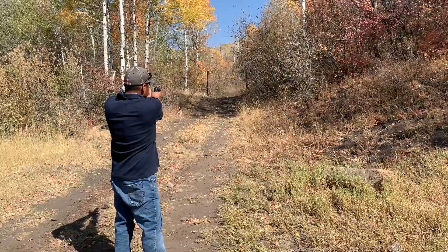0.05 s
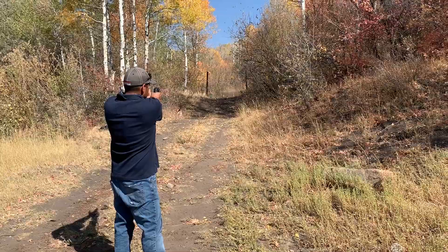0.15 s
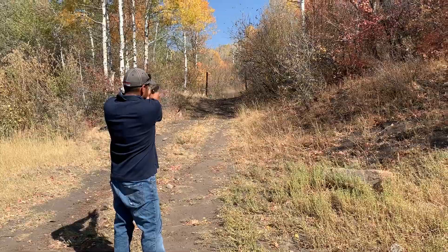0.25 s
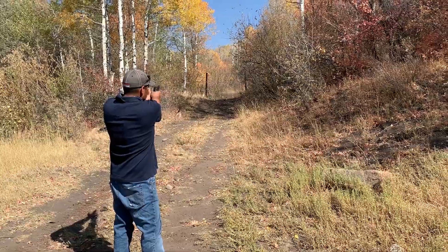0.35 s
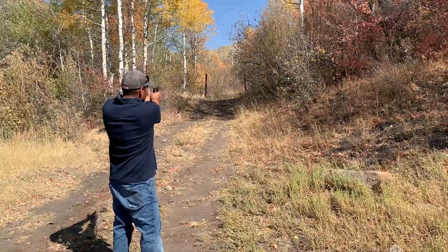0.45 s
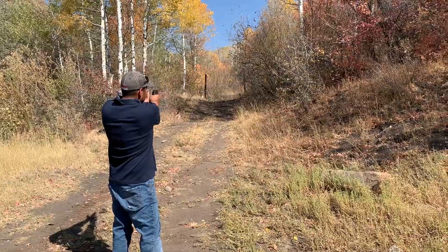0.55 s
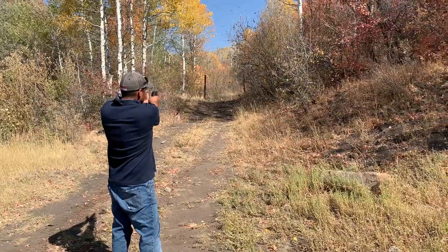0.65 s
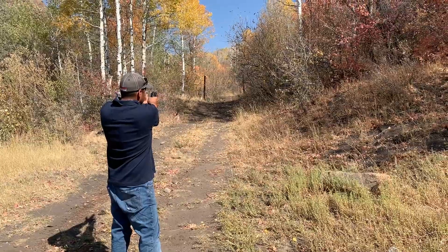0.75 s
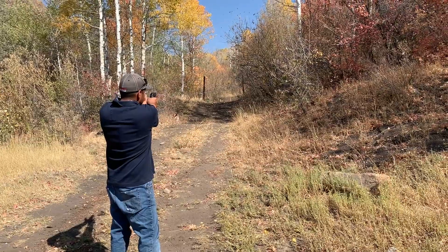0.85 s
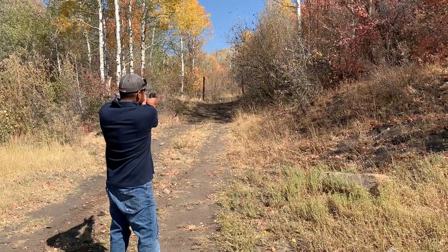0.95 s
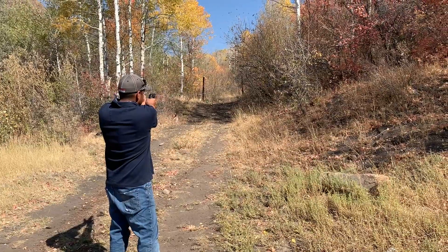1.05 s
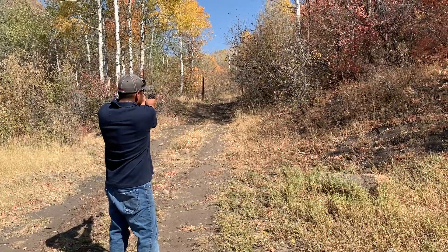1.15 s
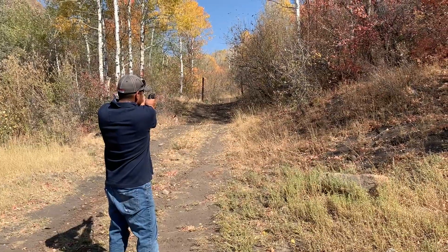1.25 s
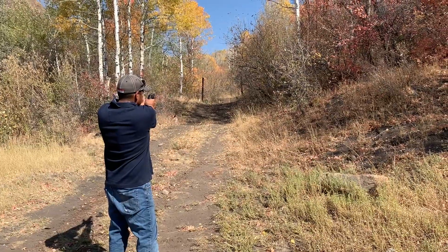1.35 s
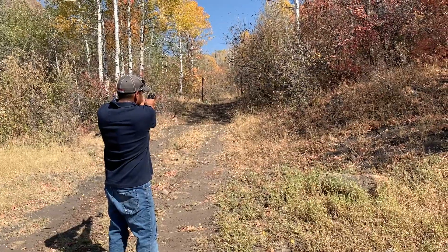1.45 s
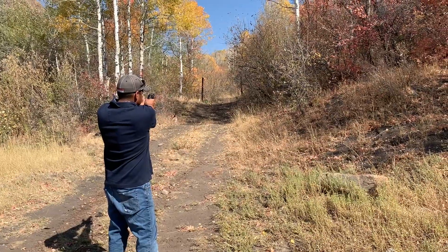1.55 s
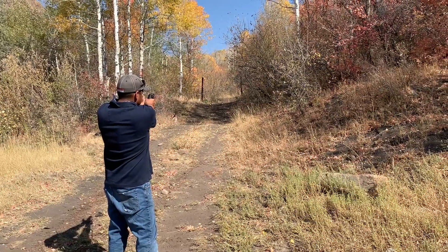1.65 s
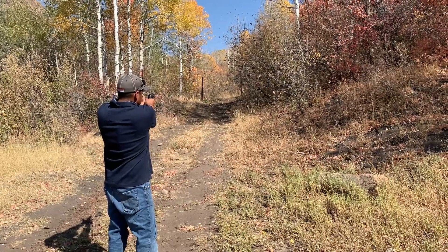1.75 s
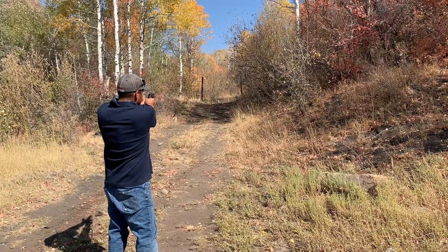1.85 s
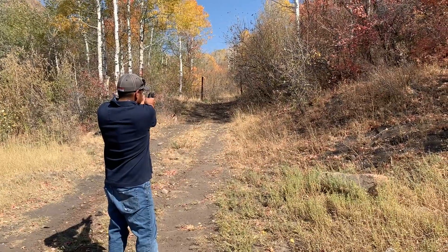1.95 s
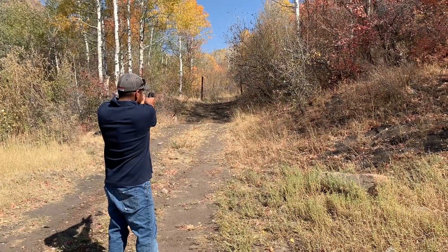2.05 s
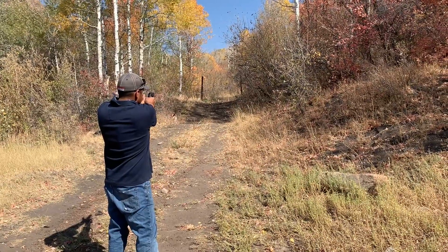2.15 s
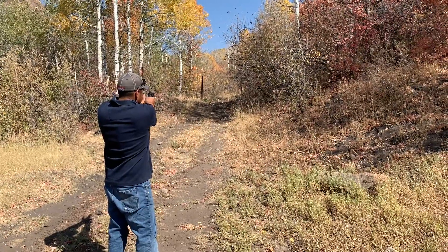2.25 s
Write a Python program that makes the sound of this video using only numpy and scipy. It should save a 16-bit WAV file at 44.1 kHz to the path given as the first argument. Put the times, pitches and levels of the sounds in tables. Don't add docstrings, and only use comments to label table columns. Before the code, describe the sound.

One handgun shot on an open wooded dirt track, picked up by a phone a few steps away; small metal clicks precede the distorted bang, its echo fades, a casing tinkles, and wind softly buffets the microphone.

```python
import sys
import numpy as np
from scipy import signal
from scipy.fft import rfft, irfft
from scipy.io import wavfile
from scipy.ndimage import uniform_filter1d

SR = 44100
rng = np.random.default_rng(int(sys.argv[2]) if len(sys.argv) > 2 else 0)


def elevation(decibels):
    levels = np.asarray(decibels, float)
    return 10 ** (levels / 20)


def wrap_up_sound(samples):
    columns = np.atleast_2d(samples).T
    tamed = np.clip(columns, -1, 1)
    steps = np.round(tamed * 32767).astype(np.int16)
    wavfile.write(sys.argv[1], SR, steps)


N = 101430

# (frequency [Hz], level [dB])
AIR_SPECTRUM = [(180, -31.5), (300, -6), (987, -20.5), (2470, -18), (3290, -22), (6110, -23.5),
                (14000, -29)]
# (time [s], level [dB])
GUST_LEVELS = [(0.0, -56.5), (0.11, -53), (0.27, -49.5), (0.38, -58), (0.56, -53.5), (0.7, -60.5),
               (0.77, -54), (0.88, -60), (1.02, -49), (1.12, -52), (1.3, -62.5), (1.4, -67.5), (1.55, -64),
               (1.66, -69), (1.74, -61), (1.9, -61), (2.05, -54.5), (2.3, -54)]
# (frequency [Hz], level [dB])
WIND_SPECTRUM = [(12, -51.5), (22, -15), (45, -1), (76, -3), (236, -24), (338, -28.5), (462, -42.5),
                 (700, -41), (910, -70.5), (1540, -120)]
# (time [s], peak [dB], frequency [Hz])
LARGE_EDDIES = [(0.096, -75, 72), (0.142, -46.5, 68.5), (0.612, -45, 71.5), (0.643, -45.5, 73.3),
                (0.799, -37, 71), (0.833, -47.5, 72.1), (0.892, -57, 74.2), (0.92, -40.5, 71.3),
                (0.984, -48.5, 76), (1.038, -33.5, 88), (1.056, -31, 69.4), (1.111, -37.5, 74.3),
                (1.232, -47, 68.2), (1.427, -55, 71.4), (1.568, -41.5, 72.8), (1.775, -44, 72.3),
                (1.834, -45, 71.6), (1.949, -51, 72.2), (1.971, -41, 71.8), (2.018, -52, 72.6),
                (2.065, -44, 70.8), (2.097, -41, 72), (2.179, -49.5, 71.95), (2.25, -51.5, 73)]
# (time [s], peak [dB], left-right [dB], scrape centre [Hz])
TRIGGER_CLICKS = [
    (0.0534, -26, -3.5, 4870),
    (0.0572, -35, -9, 3550),
    (0.0624, -41, 2, 8000),
    (0.18, -32.5, -5.5, 5000),
    (0.1837, -38, -0.5, 5850),
]
# (frequency [Hz], level [dB], T60 [s])
STEEL_MODES = [(570, -13, 0.029), (1200, -8.5, 0.015), (2160, 5, 0.013), (3000, -1, 0.01),
               (4440, -7, 0.011), (6360, -2, 0.012), (9300, -8.5, 0.0048), (13200, -10, .01)]
# (centre [Hz], width [Hz], left [dB], right [dB])
PRE_NOISE_BEDS = [(630, 240, -14.5, -21.5), (1505, 890, -27, -28.5), (3000, 1400, -32, -21.5),
                  (4430, 1800, -33, -15), (6800, 2400, -33, -19.5), (12000, 5000, -47, -46)]
# (frequency [Hz], left [dB], right [dB])
PRE_NOISE_STREAKS = [(535, -14.5, -23.5), (1500, -32.5, -22.5), (2240, -31, -21.5), (3116, -35, -23),
                     (3660, -37, -22), (3960, -36, -16.5), (4470, -34, -16), (4900, -27, -29),
                     (5300, -36, -23), (5980, -36, -17), (6700, -24, -29), (7000, -29, -24),
                     (7600, -33, -23), (8000, -19, -16.5)]
# (frequency [Hz], level [dB])
CRACK_SPECTRUM = [(500, -10), (1500, 1), (4000, -3), (8000, 3.5), (10500, -3), (13200, -6), (15200, 1),
                  (16400, -32)]
# (frequency [Hz], level [dB])
BRUSH_SPECTRUM = [(180, -30), (300, -0.5), (1010, -9.5), (2740, -20.5), (3350, -15.5), (8790, -21.5),
                  (12900, -23), (16000, -33.5)]
# (frequency [Hz], level [dB])
TRUNK_SPECTRUM = [(88, -50.5), (180, -22.5), (420, -12), (680, -6), (1050, -7), (1550, -20.5),
                  (2260, -14.5), (14000, -23.5)]
# (frequency [Hz], level [dB])
SLOPE_SPECTRUM = [(180, -44), (300, -16.5), (417, -21), (684, -2), (1520, -13), (2200, -9), (8000, -45.5),
                  (10400, -78.5), (17600, -120)]
# (time [s], peak [dB], frequency [Hz], left-right [dB])
SLAP_ECHOES = [(0.254, -19, 639.9, 2), (0.303, -29.5, 350, 2), (0.311, -29.5, 683, 2),
               (0.321, -25.5, 690, 3), (0.336, -27.5, 699, 5), (0.378, -28.5, 703, 8),
               (0.418, -33.5, 605, 3), (0.46, -34.5, 717, 3), (0.491, -44, 684, 3), (0.514, -42.5, 775, 1),
               (0.558, -43.5, 843, 2.5), (0.57, -42.5, 646, 4.5), (0.635, -48, 651, 1), (0.65, -46, 696, 4),
               (0.709, -50.5, 830, 3), (0.742, -49.5, 678, 2.5), (0.941, -59, 744, 0),
               (0.985, -60.5, 692, 0), (1.173, -70, 550, 0), (1.305, -69, 670, 0), (1.483, -72, 627, 0),
               (1.622, -74, 681, 0), (1.705, -66, 614, 0), (0.3043, -40, 2300, -1), (0.3222, -35, 2170, 3),
               (0.3711, -42, 2116, -3), (0.4345, -40.5, 2010, 3), (0.4799, -43.5, 2380, -0.5),
               (0.5008, -49.5, 1880, -1), (0.556, -52, 2050, 0), (0.7502, -54, 2020, -1.5)]
# (time [s], peak [dB], centre [Hz], left-right [dB])
GRASS_TICKS = [(0.49, -55.5, 11200, 21), (0.64, -65, 10000, -1.5), (.824, -68, 8000, -1),
               (1.018, -62.5, 2200, -0.5), (1.034, -71, 11500, 1), (1.064, -57.5, 2920, -0.5),
               (1.065, -62, 5450, -1), (1.12, -71, 2196, -4), (1.277, -78, 5500, 0), (1.3, -76, 5000, 0),
               (1.497, -64, 10040, -0.5), (1.509, -64.5, 5990, -2), (1.54, -75, 5500, 0),
               (1.6, -67, 12000, -0.5), (1.6762, -73, 2800, -2), (1.6933, -57.5, 6420, -3),
               (1.694, -66, 4000, -4.5), (1.713, -64, 5800, -3), (1.73, -70.5, 6300, -4),
               (1.81, -74, 4590, 0), (1.838, -63, 7000, -3), (1.837, -68, 2850, -1.5),
               (1.865, -68.5, 2500, -7), (1.866, -69, 5500, -4), (1.88, -73, 3500, -2),
               (1.9565, -59.5, 11030, 1), (1.957, -68, 3500, -2), (1.973, -68, 2610, -5),
               (1.983, -61.5, 4590, -6), (2.075, -81, 12000, -2), (2.165, -75, 7000, -1),
               (2.198, -72, 12000, -8.5), (2.196, -72, 3000, 0), (2.223, -78, 4500, 0)]
# (frequency [Hz], level [dB], T60 [s])
BRASS_MODES = [(3475, -7, 0.26), (4980, -23, 0.15), (5980, -22, 0.18), (8328, -13, 0.19), (8880, -15, 0.14),
               (9930, -12.5, 0.25), (10900, -17, 0.12), (11600, -5.5, 0.12), (13570, 0, 0.12),
               (13840, 0, 0.14), (13100, -3, 0.08), (14130, -16, 0.1), (15318, -16, 0.12),
               (15610, -21, 0.074)]

AIR_DB, EARLIER_ECHO_DB, EARLIER_T60_S = -79, -65, 1.2
NULL_HZ, NULL_WIDTH_HZ, CEILING_HZ = 11950, 950, 14700

WIND_DB, WIND_SIDE_DB, WIND_FLUTTER_DB = -4.5, -23.5, 2
SMALL_EDDIES_PER_S, SMALL_SCATTER_DB, SMALL_DB, SMALL_HZ = 50, 2, -0.5, 58.5
EDDY_START_RATIO, EDDY_SAG_S, EDDY_RISE_S, EDDY_T60_S = 4.1, 0.005, 0.0059, 0.15
SPRAY_DB, SPRAY_HZ, SPRAY_T60_S = -19, 290, 0.09
PORT_LAG_SAMPLES = -19

CLICK_RISE_S, CLICK_T60_S = 0.0003, 0.012

PRE_NOISE_DB_PER_S, PRE_NOISE_SPAN_S, PRE_NOISE_PEAK_S = 799, 0.03, 0.003
STREAK_WOBBLE_DB = 2.5

SHOT_S = 0.2394
CRACK_DB, CRACK_T60_S, CRACK_RISE_S, CRACK_LAG_SAMPLES = -2.5, 0.009, 0.0002, 1
BLAST_DB, BLAST_HOLD_S, BLAST_LAG_S, BLAST_T60_S = -3, 0.0062, 0.00012, 0.013
FIRST_SWING_S, SWING_STRETCH, SWING_BUILD_S = 0.0018, 0.36, 0.003
THUMP_DB, THUMP_PAN_DB, THUMP_AFTER_S = -2, 0.7, 0.0062
THUMP_CROSS_S, THUMP_T60_S = 0.0046, 0.039
SLAP_T60_S = 0.028
BRUSH_DB, BRUSH_T60_S, BRUSH_GRAIN_DB = -15, 0.12, 1.2
TRUNK_DB, TRUNK_SWELL_S, TRUNK_T60_S, TRUNK_TILT, TRUNK_GRAIN_DB = -22, 0.06, 0.75, 0.17, 2.5
SLOPE_DB, SLOPE_SWELL_S, SLOPE_T60_S, SLOPE_TILT, SLOPE_GRAIN_DB = -41.5, 0.2, 1.77, 0.33, 2.5

TICK_T60_S, TICK_WIDTH_RATIO = 0.018, 0.73

CASE_S, CASE_DB, CASE_PAN_DB, CASE_STOPS_S = 0.8902, -38.5, 7, 1.1
CASE_TICK_DB, CASE_TICK_T60_S = -42, 0.022
CASE_WOBBLE_DB, CASE_BLUR_DB = 3.5, 3.5
RING_S, RING_HZ, RING_DB, RING_T60_S, RING_STOPS_S = 1.506, 9950, -68, 0.28, 1.578
CHOKE_S = 0.0074

LOW_CUT_HZ, TOP_HZ = 9, 16050


def level(x, db):
    return x * elevation(db) / np.sqrt(np.mean(x ** 2))


def curve(table, at_hz):
    table = np.array(table, float)
    return np.interp(np.log(at_hz), np.log(table[:, 0]), table[:, 1])


def colour(x, table):
    bins_hz = np.arange(N // 2 + 1) * SR / N + 1
    return level(irfft(rfft(x) * elevation(curve(table, bins_hz)), N), 0)


def band(x, hz, width_hz):
    edges_hz = np.clip([hz - width_hz / 2, hz + width_hz / 2], 20, 0.45 * SR)
    return signal.sosfilt(signal.butter(2, edges_hz, "band", fs=SR, output="sos"), x)


def since(start_s):
    return np.maximum(np.arange(N) / SR - start_s, 0)


def fade(start_s, rise_s, t60_s):
    t = since(start_s)
    return (1 - np.exp(-t / rise_s)) ** 2 * elevation(-60 * t / t60_s)


def walk(rate_hz):
    k = int(SR / rate_hz)
    return level(uniform_filter1d(uniform_filter1d(rng.standard_normal(N), k), k), 0)


def pan(db):
    return elevation(np.array([[db / 2], [-db / 2]]))


def pair(alike_hz):
    mid, side = rng.standard_normal((2, N))
    side = signal.sosfilt(signal.butter(1, alike_hz, "high", fs=SR, output="sos"), side)
    return np.array([mid + side, mid - side])


def strike(start_s, db, modes, scatter_db):
    hz, mode_db, t60_s = np.array(modes, float).T[:, :, None]
    luck = rng.standard_normal((len(modes), 1))
    t = np.arange(SR // 3) / SR
    gain = elevation(db + mode_db + scatter_db * luck - 60 * t / t60_s)
    out = np.zeros(N + SR)
    i = int(start_s * SR)
    out[i:i + len(t)] = (gain * np.sin(2 * np.pi * hz * t)).sum(axis=0)
    return out[:N]


def ports(x):
    edges_hz = [NULL_HZ - NULL_WIDTH_HZ / 2, NULL_HZ + NULL_WIDTH_HZ / 2]
    x = signal.sosfilt(signal.butter(3, edges_hz, "bandstop", fs=SR, output="sos"), x)
    return signal.sosfilt(signal.ellip(8, 0.5, 30, CEILING_HZ, fs=SR, output="sos"), x)


def air():
    hiss = elevation(AIR_DB + 0.95 * walk(9))
    earlier_echo = elevation(EARLIER_ECHO_DB - 60 * since(0) / EARLIER_T60_S)
    return ports(colour(pair(450), AIR_SPECTRUM)) * (hiss + earlier_echo)


def eddy(start_s, hz):
    t = since(start_s)
    turns = hz * (t + EDDY_START_RATIO * EDDY_SAG_S * (1 - np.exp(-t / EDDY_SAG_S)))
    return np.sin(2 * np.pi * turns) * fade(start_s, EDDY_RISE_S, EDDY_T60_S)


def wind():
    gust_s, gust_db = np.array(GUST_LEVELS).T
    gust = elevation(np.interp(np.arange(N) / SR, gust_s, gust_db))
    rumble = colour(rng.standard_normal((2, N)), WIND_SPECTRUM)
    mid, side = rumble * gust * elevation(WIND_DB + WIND_FLUTTER_DB * walk(17))

    hits = rng.random(N) < SMALL_EDDIES_PER_S / SR
    puffs = hits * elevation(SMALL_SCATTER_DB * rng.standard_normal(N)) * rng.choice([-1, 1], N)
    small = signal.fftconvolve(puffs, eddy(0, SMALL_HZ)[:SR // 4])[:N]
    mid = mid + level(small, SMALL_DB) * gust

    spray = band(rng.standard_normal(N), SPRAY_HZ, SPRAY_HZ)
    spray = level(band(spray, SPRAY_HZ, SPRAY_HZ), SPRAY_DB)
    for s, db, hz in LARGE_EDDIES:
        mid = mid + (eddy(s, hz) + spray * fade(s, 0.005, SPRAY_T60_S)) * elevation(db + 3.5)
    both = np.array([np.roll(mid, PORT_LAG_SAMPLES), mid])
    return both + side * elevation(WIND_SIDE_DB) * np.array([[1], [-1]])


def trigger():
    noise = pair(1500)
    out = 0
    for s, db, pan_db, hz in TRIGGER_CLICKS:
        ring = strike(s, db - 12.5, STEEL_MODES, 2.5)
        scrape = band(noise, hz, 1.2 * hz) * fade(s, CLICK_RISE_S, CLICK_T60_S) * elevation(db - 3.5)
        out = out + (ring + scrape) * pan(pan_db)
    return out


def streaks():
    t = np.arange(N) / SR
    out = 0
    for hz, left_db, right_db in PRE_NOISE_STREAKS:
        tone = np.sin(2 * np.pi * (hz * t + rng.random((2, 1))))
        out = out + tone * elevation(np.array([[left_db], [right_db]]) + STREAK_WOBBLE_DB * walk(250))
    return out


def pre_noise():
    ahead_s = SHOT_S - np.arange(N) / SR
    ramp = np.clip(1 - ahead_s / PRE_NOISE_SPAN_S, 0, 1) * (ahead_s > -0.001)
    ramp = ramp * elevation(-PRE_NOISE_DB_PER_S * np.abs(ahead_s - PRE_NOISE_PEAK_S))
    beds = 0
    for hz, width_hz, left_db, right_db in PRE_NOISE_BEDS:
        bed = band(band(rng.standard_normal((2, N)), hz, width_hz), hz, width_hz)
        beds = beds + level(bed, 0) * elevation(np.array([[left_db], [right_db]]))
    return (beds + streaks()) * ramp


def crack():
    left, right = colour(pair(20000), CRACK_SPECTRUM)
    front = np.array([left, np.roll(right, CRACK_LAG_SAMPLES)])
    return front * fade(SHOT_S, CRACK_RISE_S, CRACK_T60_S) * elevation(CRACK_DB) * pan(-1.5)


def blast():
    t = np.array([since(SHOT_S), since(SHOT_S + BLAST_LAG_S)]) + 1e-6
    swing = np.cos(np.pi * np.log(t / FIRST_SWING_S) / SWING_STRETCH) * np.minimum(t / SWING_BUILD_S, 1)
    return swing * elevation(BLAST_DB - 60 * np.maximum(t - BLAST_HOLD_S, 0) / BLAST_T60_S)


def thump():
    start_s = SHOT_S + THUMP_AFTER_S
    pulse = (1 - since(start_s) / THUMP_CROSS_S) * fade(start_s, 0.00048, THUMP_T60_S)
    return pulse * elevation(THUMP_DB) * pan(THUMP_PAN_DB)


def slaps():
    out = 0
    for s, db, hz, pan_db in SLAP_ECHOES:
        tone = np.sin(2 * np.pi * hz * since(s)) * fade(s, 0.002, SLAP_T60_S)
        out = out + tone * elevation(db + 7) * pan(pan_db)
    return out


def echoes(table, db, swell_s, t60_s, tilt, grain_db, alike_hz):
    spectrum = rfft(colour(pair(alike_hz), table))
    octave = np.log2(np.arange(N // 2 + 1) * SR / N + 1)
    out = 0
    for hz in 125 * 2. ** np.arange(8):
        grain = elevation(grain_db * min(1500 / hz, 1) * np.array([walk(120), walk(120)]))
        part = irfft(spectrum * np.clip(1 - np.abs(octave - np.log2(hz)), 0, 1), N)
        out = out + part * grain * fade(SHOT_S, swell_s, t60_s * (700 / hz) ** tilt)
    return out * elevation(db)


def shot():
    brush = echoes(BRUSH_SPECTRUM, BRUSH_DB, 0.0035, BRUSH_T60_S, 0.053, BRUSH_GRAIN_DB, 800)
    trunks = echoes(TRUNK_SPECTRUM, TRUNK_DB, TRUNK_SWELL_S, TRUNK_T60_S, TRUNK_TILT, TRUNK_GRAIN_DB, 410)
    slope = echoes(SLOPE_SPECTRUM, SLOPE_DB, SLOPE_SWELL_S, SLOPE_T60_S, SLOPE_TILT, SLOPE_GRAIN_DB, 500)
    return crack() + blast() + thump() + slaps() + brush + ports(trunks) + slope


def grass():
    noise = pair(2300)
    out = 0
    for s, db, hz, pan_db in GRASS_TICKS:
        tick = level(band(noise, hz, hz * TICK_WIDTH_RATIO), db + 2.5)
        out = out + tick * fade(s, 0.00035, TICK_T60_S) * pan(pan_db)
    return out


def choke(start_s):
    return np.exp(-since(start_s) / CHOKE_S)


def case():
    tick = band(pair(3000), 5600, 16000) * fade(CASE_S, CLICK_RISE_S, CASE_TICK_T60_S) * elevation(CASE_TICK_DB)
    body = 0
    for mode in BRASS_MODES:
        waver_db = CASE_WOBBLE_DB * walk(90) + CASE_BLUR_DB * walk(600)
        depth = min(mode[0] / 9000, 1) ** 2
        body = body + strike(CASE_S, CASE_DB, [mode], 0) * elevation(depth * waver_db)
    ring = strike(RING_S, RING_DB, [(RING_HZ, 0, RING_T60_S)], 0) * elevation(4.7 * walk(110))
    return (body * choke(CASE_STOPS_S) + tick + ring * choke(RING_STOPS_S)) * pan(CASE_PAN_DB)


def scene():
    return air() + wind() + trigger() + shot() + grass() + case()


def low_pass(x):
    return signal.sosfilt(signal.butter(12, 16430, fs=SR, output="sos"), x)


def record(dry):
    dry = signal.sosfilt(signal.butter(1, LOW_CUT_HZ, "high", fs=SR, output="sos"), dry)
    wet = np.tanh(1.047 * (dry + pre_noise())) / 1.09
    mix = signal.sosfilt(signal.ellip(8, 0.2, 50, TOP_HZ, fs=SR, output="sos"), wet)
    return low_pass(mix)


dry = scene()
out = record(dry)
wrap_up_sound(out)
```